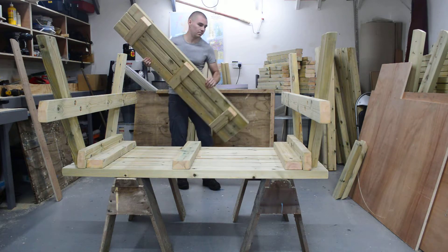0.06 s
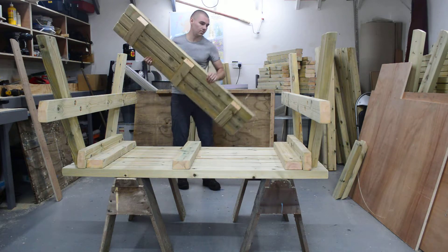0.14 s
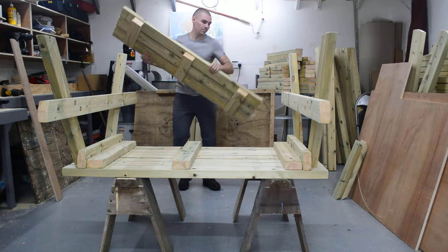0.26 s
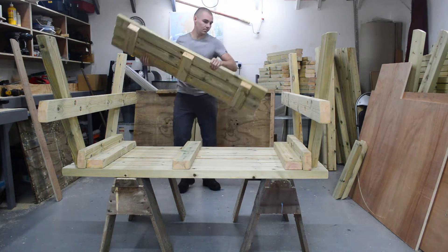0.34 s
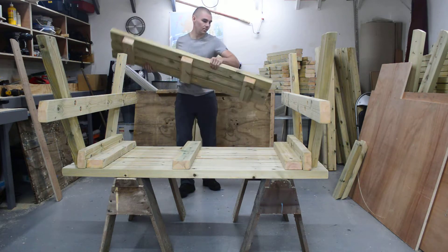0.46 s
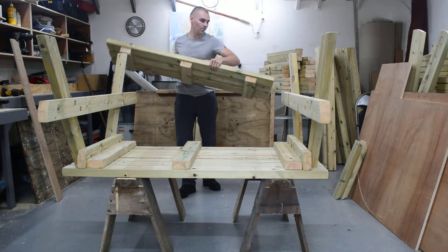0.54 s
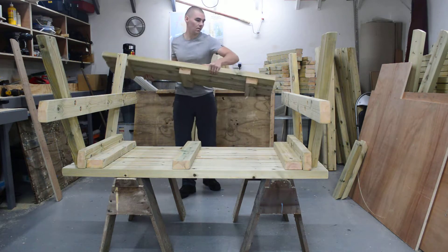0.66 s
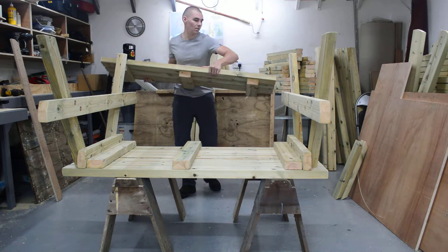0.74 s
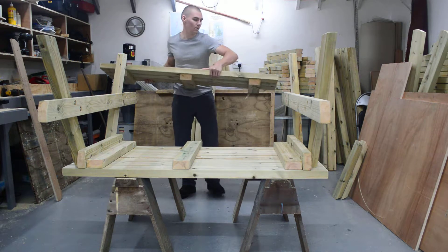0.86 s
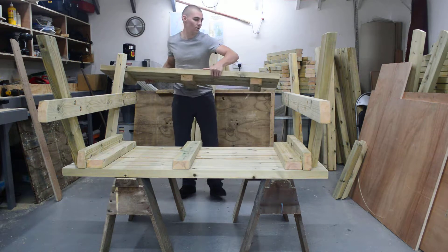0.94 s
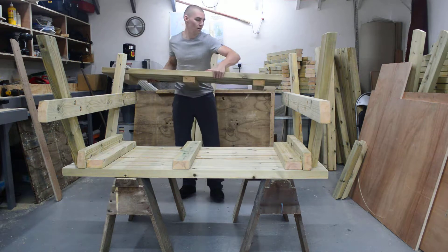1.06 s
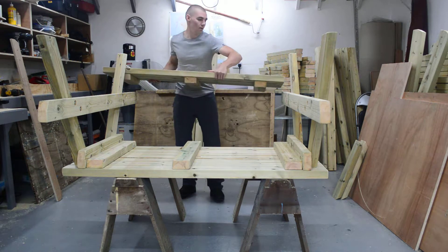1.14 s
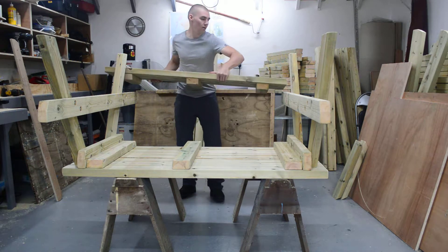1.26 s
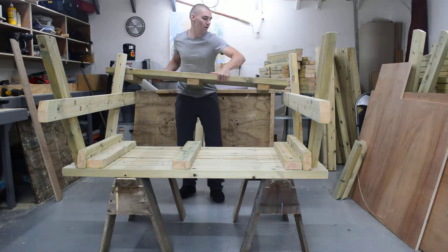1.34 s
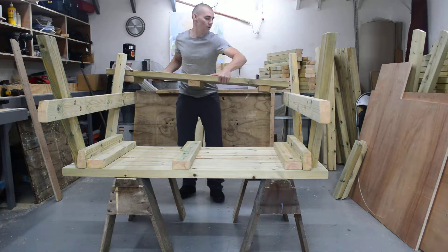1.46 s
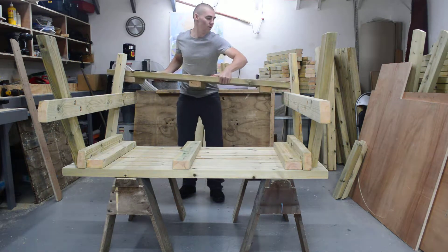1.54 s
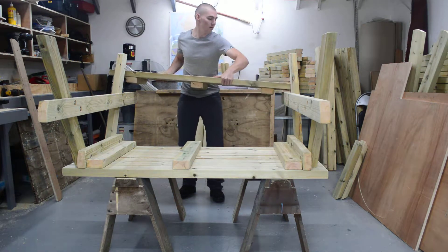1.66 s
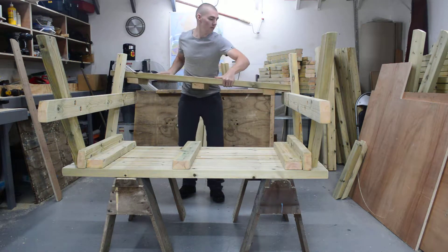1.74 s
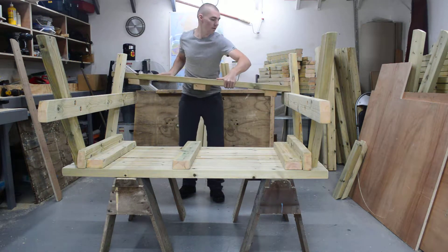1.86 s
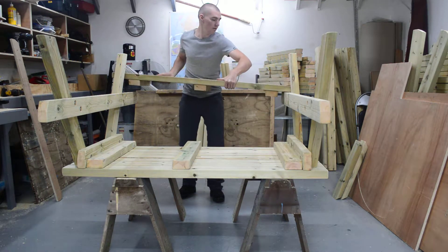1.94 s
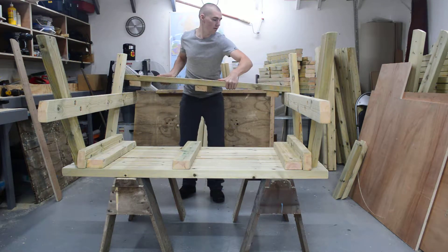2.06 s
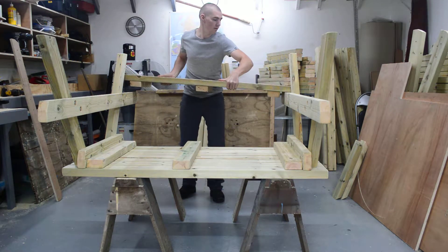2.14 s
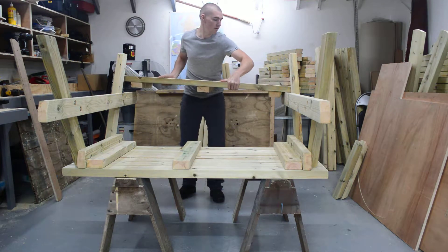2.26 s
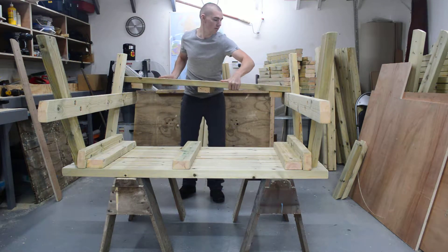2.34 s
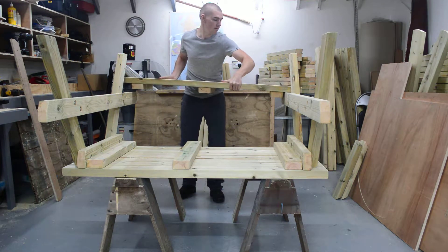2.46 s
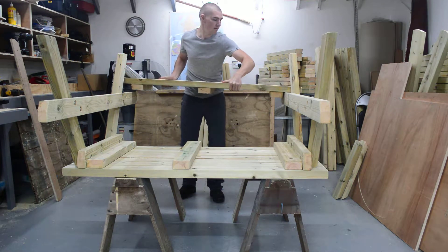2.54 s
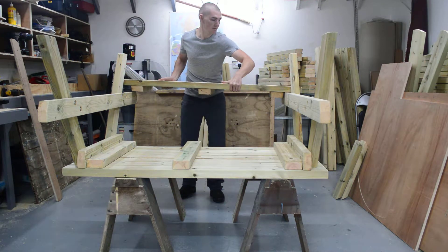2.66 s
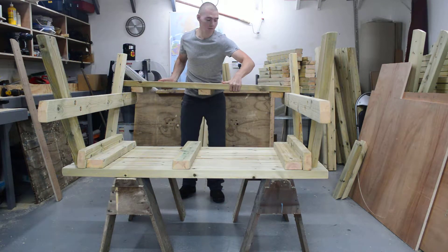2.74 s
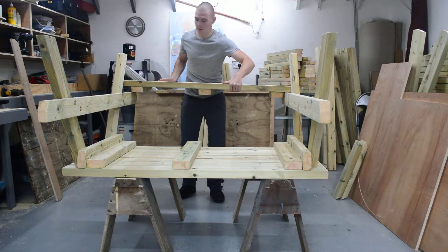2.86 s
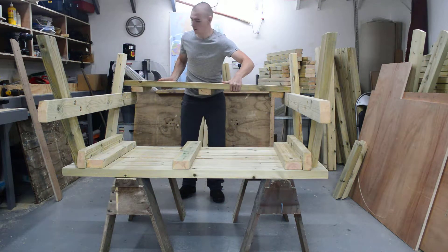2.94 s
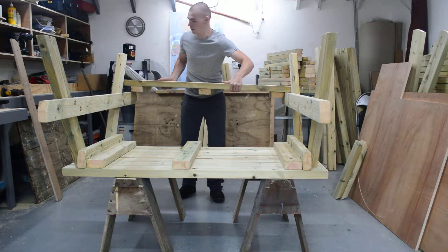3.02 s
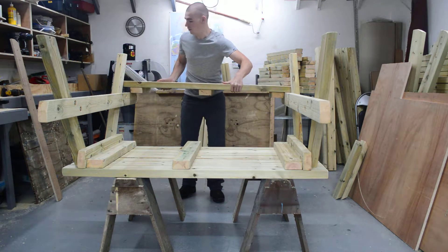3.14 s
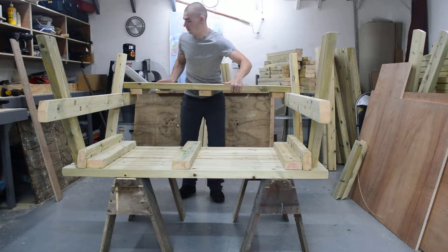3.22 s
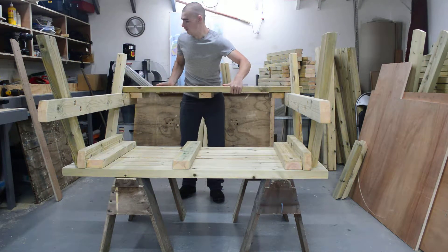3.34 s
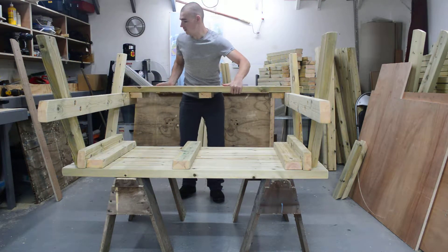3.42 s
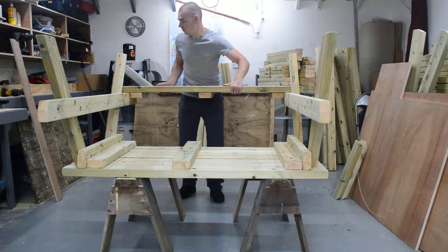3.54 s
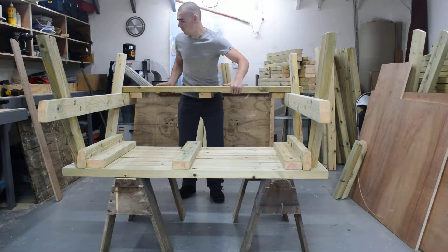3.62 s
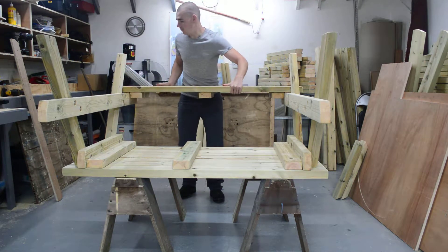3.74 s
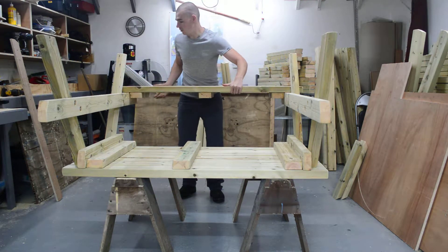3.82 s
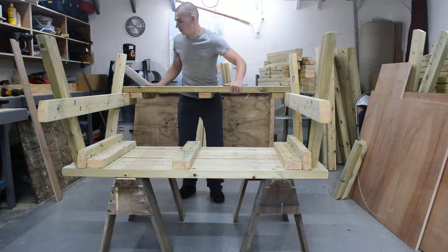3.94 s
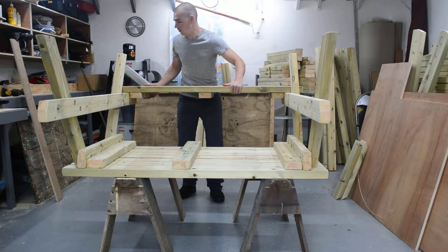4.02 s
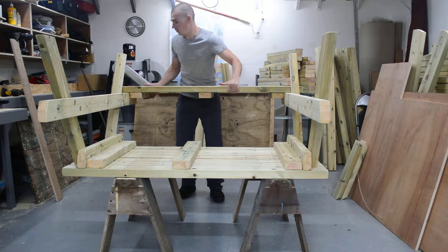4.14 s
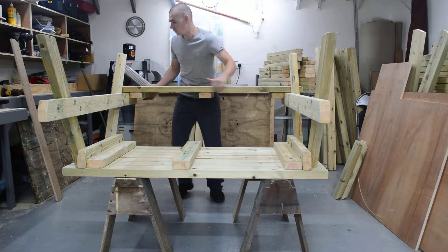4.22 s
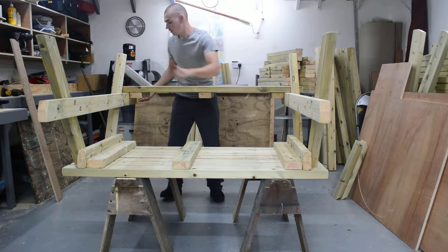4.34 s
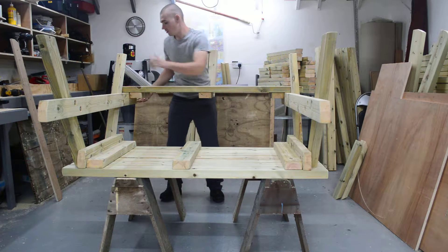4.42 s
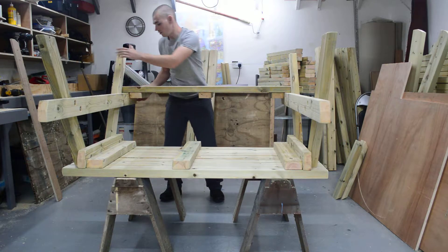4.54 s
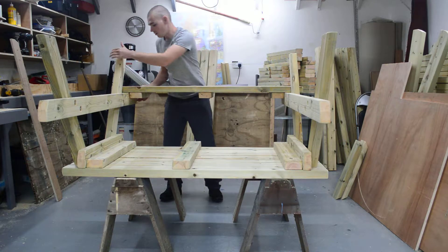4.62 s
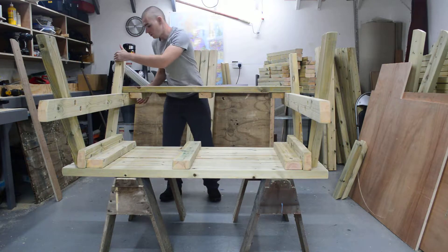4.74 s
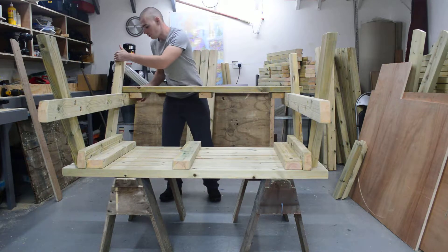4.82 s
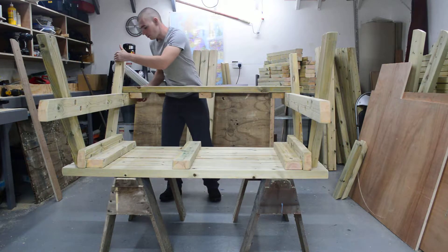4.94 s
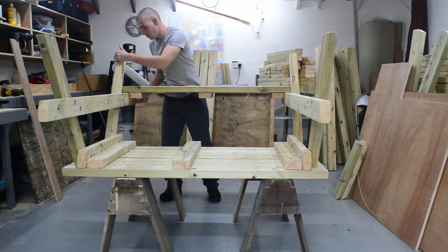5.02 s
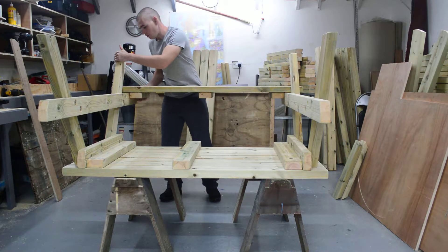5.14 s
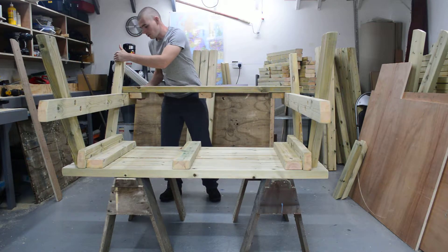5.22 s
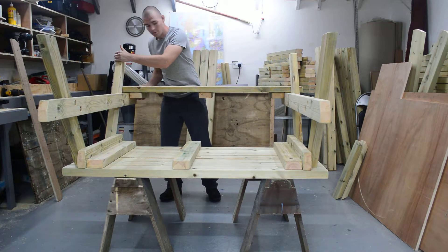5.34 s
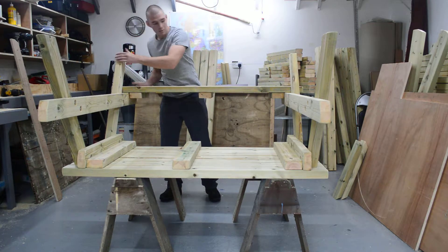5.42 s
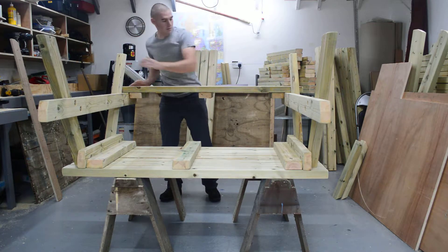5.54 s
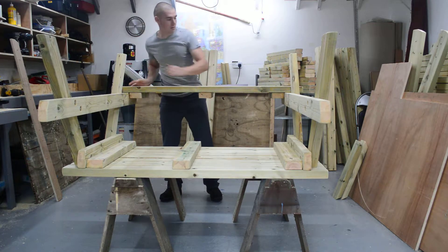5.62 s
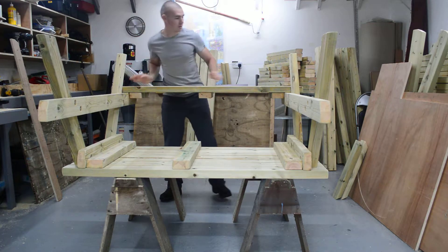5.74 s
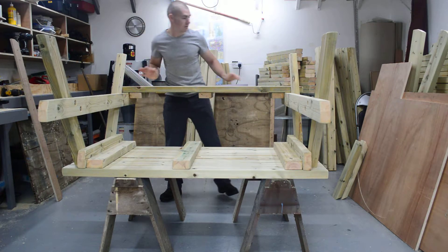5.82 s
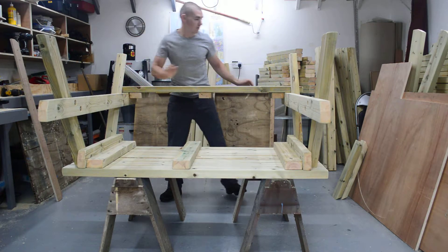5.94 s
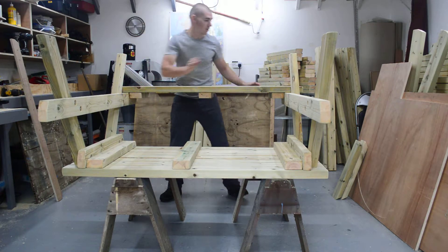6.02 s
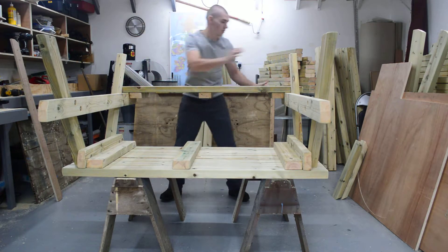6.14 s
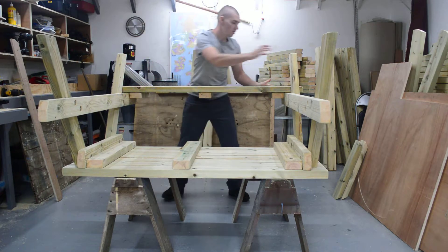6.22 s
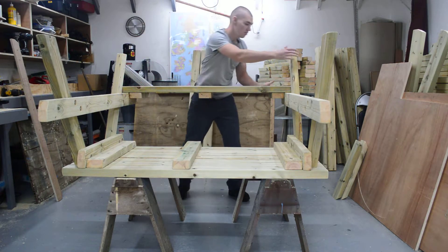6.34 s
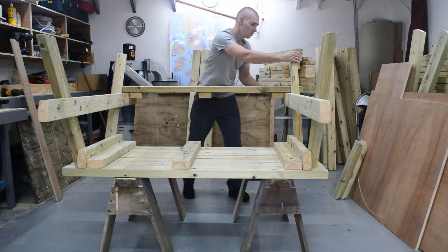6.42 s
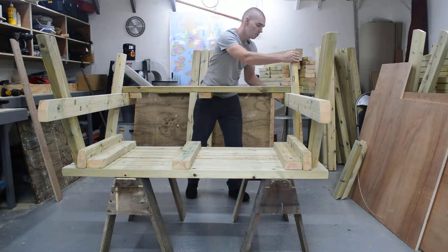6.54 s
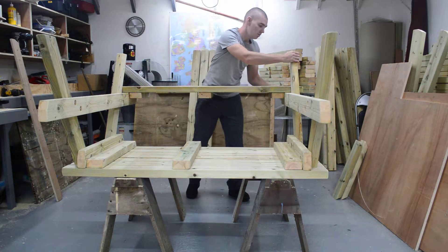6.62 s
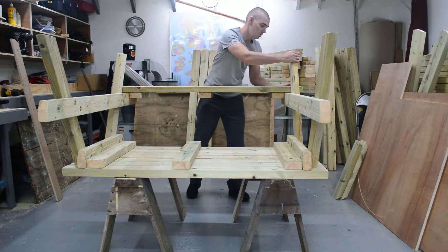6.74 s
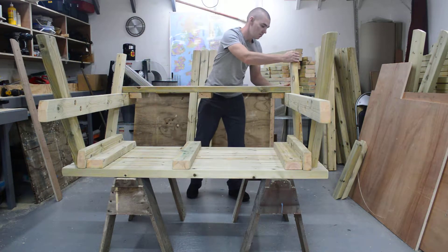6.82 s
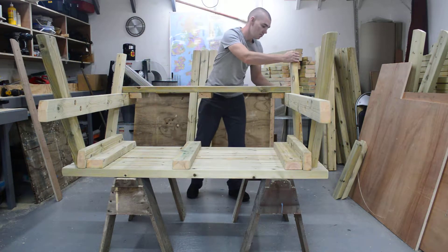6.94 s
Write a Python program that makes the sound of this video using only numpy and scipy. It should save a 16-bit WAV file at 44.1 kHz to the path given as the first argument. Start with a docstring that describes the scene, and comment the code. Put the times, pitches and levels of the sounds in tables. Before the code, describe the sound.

A wooden panel is fitted by hand into a heavy timber frame. Quiet friction and light taps come first, then a clattering contact, low woody thumps and a short high sliding hiss into the heaviest knock. Tight joints click sharply, hands brush the wood and lighter knocks follow. A fixed microphone a little way off picks up short room reflections and a faint low drone.

```python
"""Timber panel knocked into a bench frame

A slatted panel is lowered between the uprights of a bench frame in a workshop and knocked into place.
Each blow sums decaying frame and board modes, room-spread noise and a gritty edge crack; joints snap.
Shaped hiss rubs between the blows, over steady air noise, a low drone, a faint hum and an opening ring.
"""
import sys
import numpy as np
from scipy import signal
from scipy.fft import rfft, irfft, next_fast_len
from scipy.io import wavfile
from scipy.ndimage import uniform_filter1d, map_coordinates

SR = 44100
rng = np.random.default_rng(int(sys.argv[2]) if len(sys.argv) > 2 else 0)


def waveform_to_disk(signal):
    """Save audio, clipped to [-1, 1], as 16-bit WAV at the path in sys.argv[1]."""
    frames = np.transpose(np.atleast_2d(signal))
    scaled = np.clip(frames, -1, 1) * 32767
    samples = np.round(scaled).astype(np.int16)
    wavfile.write(sys.argv[1], SR, samples)


N = 307377
TIME = np.arange(N) / SR  # seconds since the start
AGE = np.arange(SR) / SR  # seconds since a blow
RISE_S = 0.004  # time constant of the faces bedding against each other

# Colour of crushed edges and snapping joints. Each row: frequency in Hz, relative level in dB per Hz.
EDGE_SPECTRUM = [(300, -42), (1500, -18.5), (3500, 0), (5500, -2.5), (7500, -5), (10000, -4),
                 (11500, -12.5), (13500, -22), (16000, -38)]


def amp(db):
    """Decibels to gain."""
    return 10 ** (np.asarray(db) / 20)


def unit(x):
    """Scale to rms 1."""
    return x / np.sqrt(np.mean(x ** 2) + 1e-20)


def burst(x):
    """Scale a one-second decay to the energy of a tenth of a second at rms 1."""
    return unit(x) / np.sqrt(10)


def along(points, hz):
    """Read a curve of (Hz, value) points on a logarithmic frequency axis."""
    point_hz, values = np.transpose(points)
    return np.interp(np.log(hz + 1), np.log(point_hz + 1), values)


def filtered(x, response):
    """Multiply the spectrum of x by a response given as a function of frequency."""
    size = next_fast_len(len(x) + 8192)
    spectrum = rfft(x, size) * response(np.fft.rfftfreq(size, 1 / SR))
    return irfft(spectrum, size)[:len(x)]


def noise(spectrum):
    """Steady noise of rms 1 with the given colour."""
    return unit(filtered(rng.standard_normal(N), lambda hz: amp(along(spectrum, hz))))


def narrow(peaks):
    """Noise of rms 1 ringing in resonances of (Hz, half-width in Hz, dB)."""
    def shape(f):
        return sum(amp(db) / (1 + ((f - hz) / width) ** 2) for hz, width, db in peaks)

    return unit(filtered(rng.standard_normal(N), shape))


def wobble(rate):
    """A smooth random curve with this many knots a second."""
    knots = rng.standard_normal(int(N * rate / SR) + 4)
    return map_coordinates(knots, [TIME * rate])


def envelope(start, attack, hold, t60):
    """A smooth attack, a hold, then a release that loses 60 dB in t60 seconds."""
    age = TIME - start
    rising = np.sin(np.pi / 2 * np.clip(age / attack, 0, 1)) ** 2
    return rising * np.exp(-np.log(1000) * np.maximum(age - attack - hold, 0) / t60)


def add(track, s, sound):
    """Mix a sound into the track at time s in seconds."""
    start = max(0, round(s * SR))
    track[start:start + len(sound)] += sound[:max(0, N - start)]


def room_noise():
    """Steady air noise, and a low drone that wavers because it is noise in one narrow band."""
    # Each row: frequency in Hz, relative level in dB per Hz.
    air_spectrum = [(12, -58), (20, -23), (65, -3), (123, -17), (142, -11.5), (285, -12), (357, -15.5),
                    (410, -17.5), (513, -15.5), (590, -13), (660, -14), (949, -16), (2600, -24),
                    (3340, -26.5), (16000, -38)]
    drone = narrow([(67.2, 2.6, 0)])
    return amp(-49.0) * noise(air_spectrum) + amp(-62.5) * drone


def faint_hum(pitch_hz):
    """A soft sine, its phase wavering slightly, swells around the heaviest blow and lingers after it."""
    phase = 2 * np.pi * pitch_hz * TIME + 0.5 * wobble(4.64)
    tone = np.sqrt(2) * np.sin(phase)
    return amp(-56.5) * envelope(start=3.3, attack=0.44, hold=0.5, t60=1.4) * tone


def fading_ring():
    """A thin, fuzzy ring of narrow noise bands wavers and fades from the start with a soft rush."""
    # Each row: frequency in Hz, half-width in Hz, relative level in dB.
    whine_peaks = [(1350, 60, -9), (1490, 37, -13), (1648, 38, 2.5), (2060, 70, -11), (3310, 280, -10)]
    # Each row: frequency in Hz, relative level in dB per Hz.
    rush_spectrum = [(60, -17), (250, 2), (800, -0.5), (1500, 4.5), (2300, -9), (5000, -6.5), (12000, -47)]
    ring = unit(narrow(whine_peaks) * amp(2.4 * wobble(17.5)))
    rush = noise(rush_spectrum)
    fade = envelope(start=0, attack=1 / SR, hold=0.12, t60=1.92)
    return fade * (amp(-44.5) * ring + amp(-45) * rush)


def rubbing():
    """Uneven friction hiss of hands, clothes and wood, and a high sizzle as the panel slides home."""
    # Colour of the friction. Each row: frequency in Hz, relative level in dB per Hz.
    rub_spectrum = [(200, 0), (900, 1), (2500, 2), (4000, 0), (6500, 0), (10000, 1), (12000, -8),
                    (16000, -25)]
    # Strokes on the wood. Each row: start in seconds, length before release in seconds, level in dB.
    stroke_list = [(0, .06, -49), (.04, 0.3, -50.5), (.46, 0.056, -54.5), (0.603, 0.069, -51.5),
                   (2.297, 0.12, -54.5), (3.26, 0.17, -46), (4.023, 0.15, -52), (4.34, 0.099, -54),
                   (4.553, 0.19, -54), (5.307, 0.067, -45), (5.41, .07, -50), (5.654, 0.062, -46),
                   (6.055, .05, -45), (6.148, 0.097, -53), (6.376, .09, -51.5)]
    rise_share = 0.42  # share of a stroke spent speeding up
    handling_db = -63  # light rustle between strokes

    catches = amp(2.4 * wobble(40) + 0.83 * wobble(900))  # slow unevenness and fine catches
    strokes = np.zeros(N)
    for s, length, db in stroke_list:
        strokes += amp(db) * envelope(s, rise_share * length, (1 - rise_share) * length, t60=0.45)
    hiss = np.hypot(strokes, amp(handling_db)) * unit(noise(rub_spectrum) * catches)

    # the panel slides off its rest just before it lands
    slide = amp(-39.5) * envelope(start=3.28, attack=0.055, hold=0, t60=0.14)
    sizzle = unit(narrow([(9800, 730, 0)]) * catches)
    return hiss + slide * sizzle


def reverberant(spectrum, early_db, early_t60):
    """A blow spread by the room: strong near reflections, then each band dies at its own speed."""
    # Room decay. Each row: frequency in Hz, time to lose 60 dB in seconds.
    room_t60 = [(60, 0.55), (160, 0.52), (420, 0.54), (1100, 0.44), (2900, 0.41), (7700, 0.34),
                (15000, 0.31)]
    coloured = filtered(rng.standard_normal(SR), lambda hz: amp(along(spectrum, hz)))
    hz, t, bands = signal.stft(coloured, SR, nperseg=512)
    decay = amp(-60 * t / along(room_t60, hz)[:, None])
    tail = signal.istft(bands * decay, SR, nperseg=512)[1][:SR]
    return tail * (1 + amp(early_db - 60 * AGE / early_t60))


def snaps(pitch_hz, life, echo_db):
    """A joint lets go: a tiny, very high click straight to the microphone, then a faint room tail."""
    # Tight joints. Each row: time in seconds, level in dB of the click's envelope peak.
    snap_list = [(3.191, -14), (3.233, -24), (3.956, -19.5), (4.8244, 0.5), (4.856, -15.5), (5.1703, -6)]
    pulse = AGE / life * np.exp(1 - AGE / life)  # peaks at 1 when life seconds old
    click = pulse * np.sin(2 * np.pi * pitch_hz * AGE)
    track = np.zeros(N)
    for s, db in snap_list:
        echo = burst(reverberant(EDGE_SPECTRUM, early_db=-1, early_t60=0.02))
        add(track, s, amp(db) * (click + amp(echo_db) * echo))
    return track


def ringing(modes, scatter_db):
    """Decaying modes: strengths vary with where the blow lands, and loose joints let phases drift."""
    hz, db, t60 = np.transpose(modes)[:, :, None]
    db = db + scatter_db * rng.standard_normal(hz.shape)
    walks = np.cumsum(rng.standard_normal((len(modes), 101)), axis=1)
    drift = np.array([np.interp(AGE, np.linspace(0, 1, len(walk)), walk) for walk in walks])
    phase = rng.uniform(0, 2 * np.pi, hz.shape) + 0.0089 * np.sqrt(hz) * drift
    decay = np.exp(-np.log(1000) * AGE / t60)
    return np.sum(amp(db) * decay * np.sin(2 * np.pi * hz * AGE + phase), axis=0)


def swell(rise):
    """The build-up of a vibration as the faces bed against each other."""
    return 1 - np.exp(-AGE / max(rise, 1 / SR))


def thump():
    """The heavy frame takes up a blow slowly and hums in its low modes."""
    # Bench frame. Each row: frequency in Hz, mean relative level in dB, time to lose 60 dB in seconds.
    frame_modes = [(72.9, -3.5, 0.81), (99.3, -4.5, 0.49), (143, -5.5, 0.5), (158.4, 7, 0.28),
                   (186, 0, 0.59), (201.5, 2.5, 0.34), (253.8, -6.5, 0.47), (293.2, 3.5, 0.22),
                   (321, -4.5, 0.48), (361.4, -5, 0.22), (448, -10, 0.24), (485, -7, 0.52)]
    # Each row: frequency in Hz, relative level in dB per Hz.
    thud_spectrum = [(30, -16), (65, -28), (100, 8), (125, 1), (165, -3), (350, 14), (600, 3), (1200, -48),
                     (4000, -70)]
    modes = burst(ringing(frame_modes, scatter_db=2.5))
    spread = burst(reverberant(thud_spectrum, early_db=6.5, early_t60=0.077))
    return burst((modes + amp(-3.5) * spread) * swell(0.0079) ** 2)


def knock(corner_hz, q, rise):
    """The boards ring up to the corner set by the springy contact: harder is brighter."""
    # Boards. Each row: frequency in Hz, mean relative level in dB, undamped time to lose 60 dB in seconds.
    board_modes = [(371, -1, 0.46), (449, -3.5, 0.4), (527, 0, 0.28), (590, -3.5, 0.55), (634, -5, 0.5),
                   (802.8, 1.5, 0.32), (888, -3, 0.37), (933, 0, 0.27), (1063, -3.5, 0.27),
                   (1153, -3, 0.21), (1270, -5, 0.32), (1292, -6, 0.5), (1414, -1.5, 0.34),
                   (1465, 3.5, 0.24), (1758, -6, 0.18), (1960, -12, 0.48), (2473, 0.5, 0.35),
                   (2623, 1, 0.3), (2820, -0.5, 0.35), (3210, 2.5, 0.23), (3720, 1, .2)]
    # Each row: frequency in Hz, relative level in dB per Hz.
    timber_spectrum = [(30, -38), (70, -9), (150, -0.5), (400, -5), (800, 0), (1100, -1), (1500, -0.5),
                       (1950, 0.5), (2400, -2.5), (3200, 1.5), (5000, -6), (10000, -8), (15000, -22)]
    thin_hz = 0.064 * corner_hz * q ** 2  # a freely ringing slat radiates little bass
    cushion_hz = 1.36 * corner_hz * (1 + (corner_hz / 1100) ** 2)  # a soft touch has no sharp edges

    def contact(f):
        bass_cut = (1j * f / (thin_hz + 1j * f)) ** 2
        spring = 1 / (1 - (f / corner_hz) ** 2 + 1j * f / (corner_hz * q))
        cushion = 1 / (1 - (f / cushion_hz) ** 2 + 1j * f / cushion_hz)
        return bass_cut * spring * cushion

    damping = 8 * (400 / corner_hz) ** 2  # a soft contact stays pressed on and mutes the board
    shape = swell(rise) * np.exp(-damping * AGE)
    modes = burst(filtered(ringing(board_modes, scatter_db=2.0) * shape, contact))
    timber = reverberant(timber_spectrum, early_db=-9.0, early_t60=0.022)
    spread = burst(filtered(timber * shape, contact))
    return burst(spread + amp(-6) * modes)


def crack(rise):
    """Fibres at the edges crush in a gritty burst that builds up much faster than the knock."""
    grit = amp(2.0 * unit(uniform_filter1d(rng.standard_normal(SR), size=40)))
    spread = reverberant(EDGE_SPECTRUM, early_db=-16.0, early_t60=0.08)
    return burst(spread * grit * swell(0.017 * rise))


def blows():
    """Every blow sounds frame, boards and edge together; a light tap leaves the heavy frame still."""
    # Wood on wood. Each row: time in seconds, frame thump in dB, board knock in dB,
    # contact corner in Hz, edge crack in dB.
    blow_list = [ (1.834, -40.5, -46.5, 570, -72), (1.875, -45, -55, 600, -58.5),
                 (1.954, -52.5, -62, 220, -60.5), (2.129, -44, -39, 700, -55),
                 (2.138, -41, -30.5, 1900, -41), (2.153, -38, -24.5, 1480, -37),
                 (2.428, -38.5, -45, 695, -61), (2.713, -34, -35.5, 364, -59.5),
                 (2.727, -35.5, -35, 400, -61), (2.737, -40, -40, 1200, -59),
                 (2.776, -39, -32.5, 1440, -47), (3.167, -34, -35, 2100, -46),
                 (3.190, -31, -32.5, 1340, -40.5), (3.345, -30, -13, 850, -48),
                 (3.349, -40, -21, 1500, -48), (3.445, -40, -32.5, 1100, -43),
                 (3.955, -39.5, -34.5, 2940, -40.5), (4.346, -50, -55, 398, -57.5),
                 (4.477, -39, -32, 3000, -36), (4.785, -39, -34, 2160, -36), (4.790, -41, -30.5, 360, -60),
                 (4.824, -28.5, -28.5, 2000, -34.5), (4.840, -33, -27.5, 420, -40.5),
                 (5.152, -50, -40.5, 4050, -37.5), (5.170, -36, -35.5, 940, -42),
                 (6.126, -56, -51.5, 350, -72), (6.314, -47, -42, 720, -59),
                 (6.666, -32, -31.5, 2500, -41.5), (6.697, -33.5, -27, 2550, -40.5),
                 (6.722, -37.5, -33, 450, -52), ]
    # Light taps as the panel is handled. Each row: time in seconds, reference level in dB.
    tap_list = [(0.1408, -28), (0.5528, -34), (0.9682, -37), (3.777, -32), (4.1966, -36.5), (6.0606, -35)]
    # Faces spring back, hard edges crush. Each row: contact corner in Hz, resonance Q.
    springiness = [(400, 2.03), (900, 1.31), (1450, 2.07), (2100, 0.71), (4000, 0.89)]
    tap_hz, tap_knock_db, tap_crack_db = 2740, -18.5, -17.5  # contact corner; dB re each tap's level

    track = np.zeros(N)
    for s, thump_db, knock_db, corner_hz, crack_db in blow_list:
        frame = amp(thump_db) * thump()
        boards = amp(knock_db) * knock(corner_hz, along(springiness, corner_hz), RISE_S)
        edge = amp(crack_db) * crack(RISE_S)
        add(track, s, frame + boards + edge)
    for s, db in tap_list:
        boards = amp(db + tap_knock_db) * knock(tap_hz, along(springiness, tap_hz), RISE_S)
        edge = amp(db + tap_crack_db) * crack(RISE_S)
        add(track, s, boards + edge)
    return track


def scene():
    """All sources at one microphone."""
    background = room_noise() + faint_hum(pitch_hz=323) + fading_ring()
    joints = snaps(pitch_hz=8970, life=0.00009, echo_db=-40.0)  # life in seconds
    return (background + rubbing() + joints + blows())[None]


def record(dry):
    """The recorder clips at full scale, then keeps nothing above its 16.2 kHz band limit."""
    clipped = np.clip(dry[0], -1, 1)
    return filtered(clipped, lambda hz: hz < 16200)[None]


dry = scene()
out = record(dry)
waveform_to_disk(out)
```